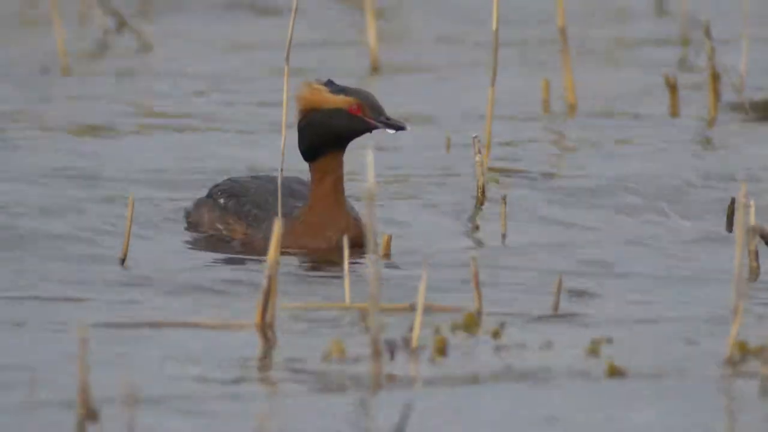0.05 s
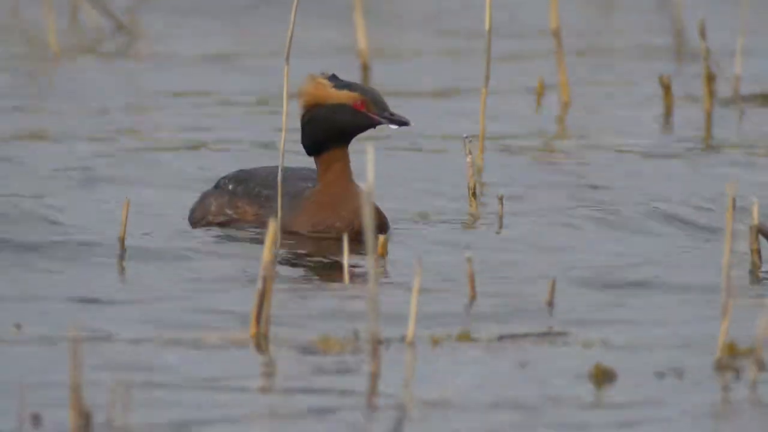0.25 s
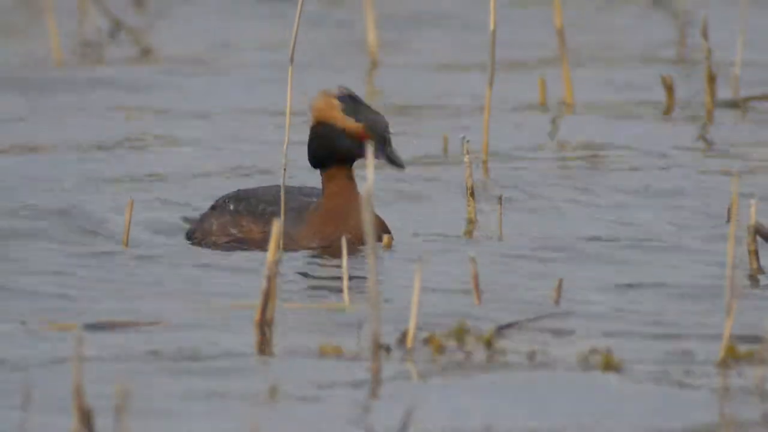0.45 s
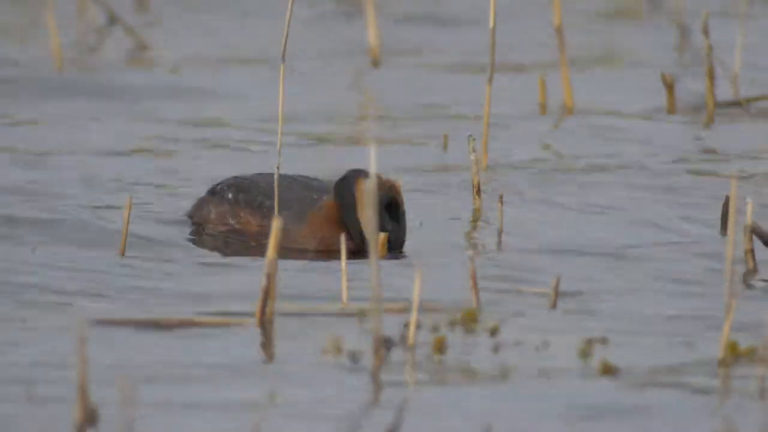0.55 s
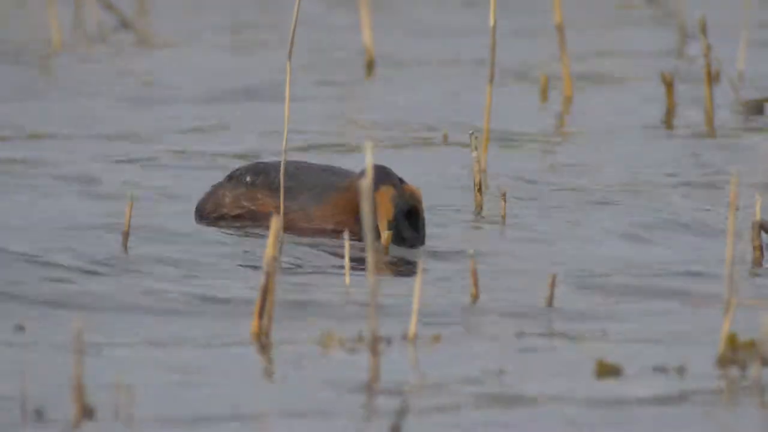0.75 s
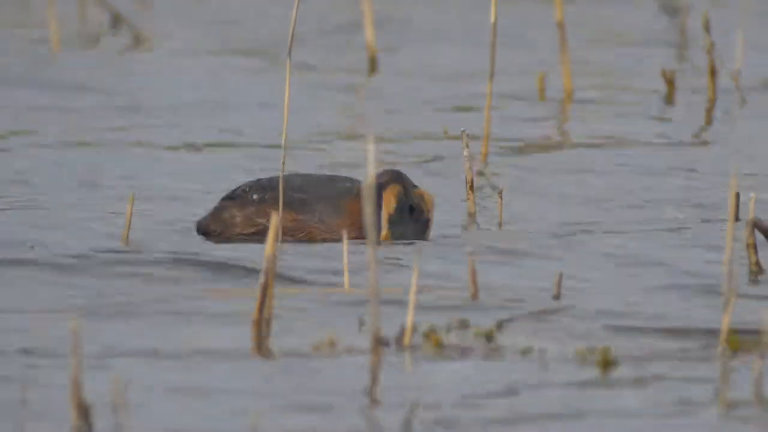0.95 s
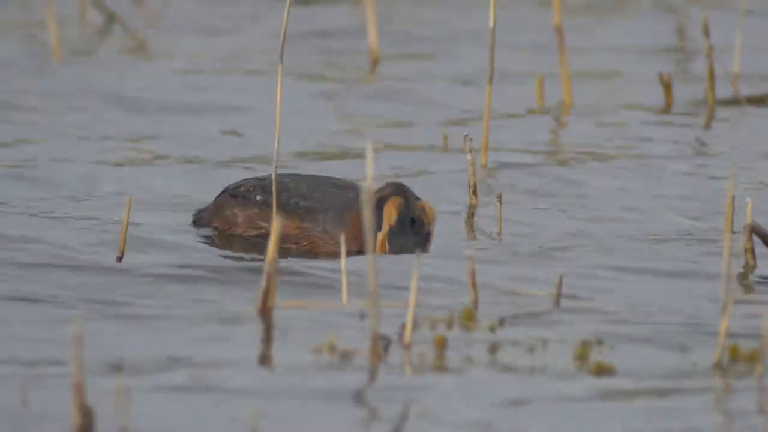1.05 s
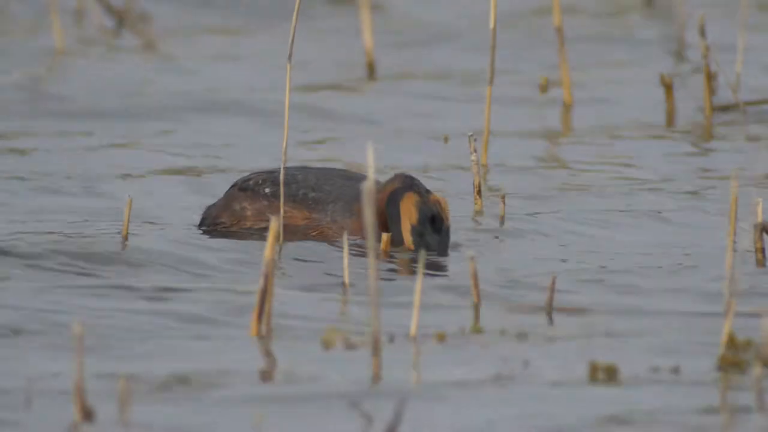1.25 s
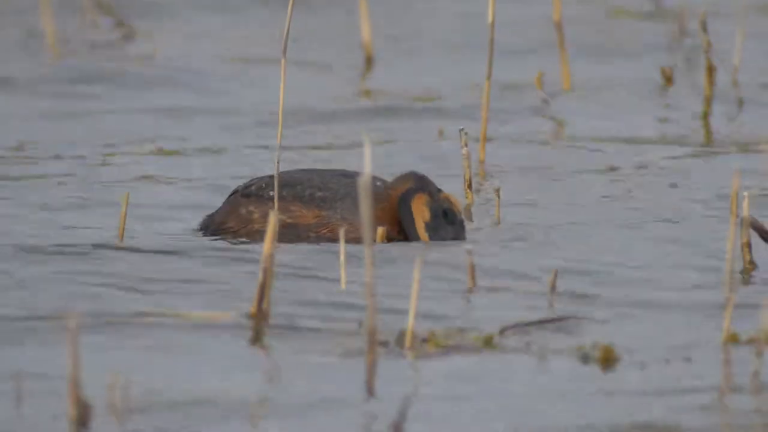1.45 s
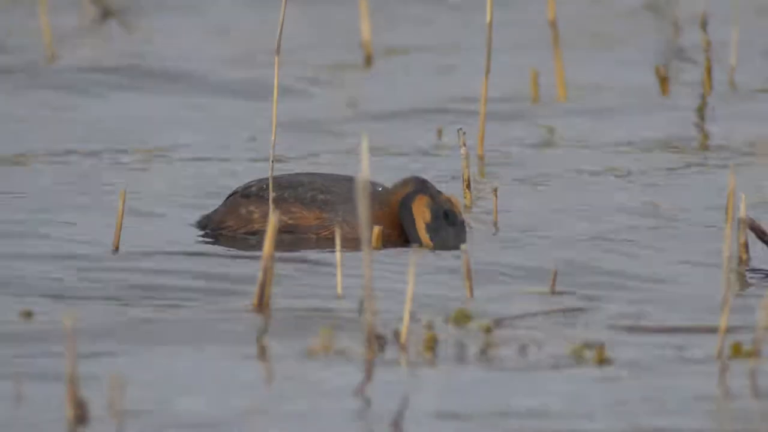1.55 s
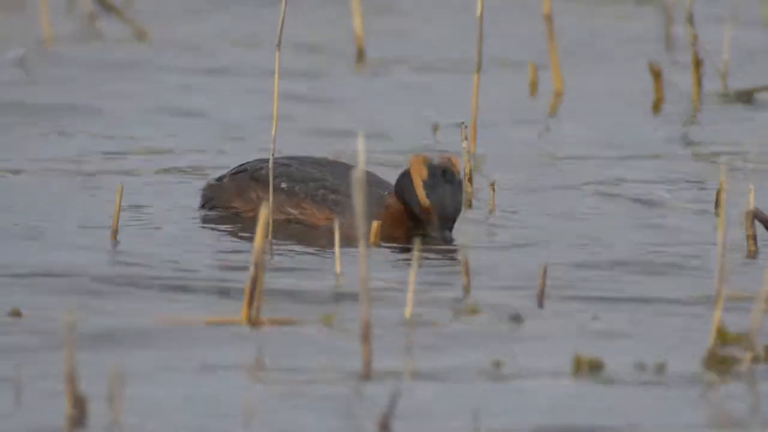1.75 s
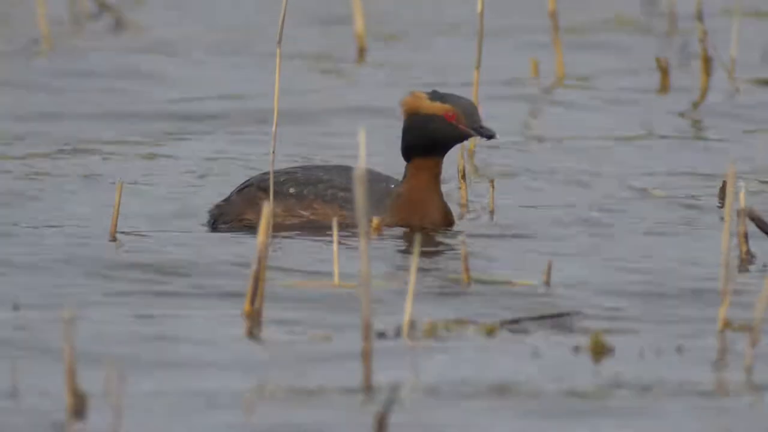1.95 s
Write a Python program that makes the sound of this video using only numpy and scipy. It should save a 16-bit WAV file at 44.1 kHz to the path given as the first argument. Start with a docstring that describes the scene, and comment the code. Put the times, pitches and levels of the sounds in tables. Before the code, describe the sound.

Wind rumble presses on the microphone, mainly on the right, with low dull thumps crowding from 0.5 to 1.0 s, then easing. A distant bird on the right gives thin whistles and fast trills around 0.5-0.9 s and 1.35-1.97 s, with fainter high twitters between. One soft water wash comes near 1.1 s, then gentle ripples. Dry reeds tick faintly, mostly after 1.8 s, over a far roar and thin hiss.

```python
"""A distant bird off to the right gives thin whistles that break into trills: sine tones with drawn pitch and level.
Farther songbirds twitter in short sine slurs. Light wind puts shaped-noise rumble and low, sagging thumps on the
microphone, mostly on its right port. Dry reeds tick and brush in grainy noise bursts, most of them near the end.
Soft noise makes one wash and the ripples of a lake shore, over a far-off roar and a thin hiss."""
import sys
import numpy as np
from scipy import signal
from scipy.fft import rfft, irfft, next_fast_len
from scipy.io import wavfile
from scipy.ndimage import map_coordinates

SR = 44100
rng = np.random.default_rng(int(sys.argv[2]) if len(sys.argv) > 2 else 0)


def to_wav(s):
    """Save 16-bit WAV."""
    ch = np.atleast_2d(s).T  # columns
    pcm = np.round(np.clip(ch, -1, 1) * 32767)  # PCM
    wavfile.write(sys.argv[1], SR, pcm.astype(np.int16))


N = 88200

# Left-right likeness of sound from all around: f/Hz, correlation (-1 to 1)
OPEN_AIR = [(100, 1), (850, 0.8), (1400, 0.26), (2000, 0.37), (3300, -0.44), (6000, 0.33), (10000, 0.31)]


def amp(db):
    """Decibels to gain."""
    return 10 ** (np.asarray(db) / 20)


def unit(x):
    """Scale to rms 1."""
    return x / np.sqrt(np.mean(x ** 2) + 1e-20)


def clock():
    """Time of every sample in seconds."""
    return np.arange(N) / SR


def along(points, hz):
    """Read a (f/Hz, value) curve on a log frequency axis."""
    f, value = np.transpose(points)
    return np.interp(np.log(hz + 1), np.log(f + 1), value)


def curves(rows):
    """One value per sample for each column after the time."""
    s, *columns = np.transpose(rows)
    return [np.interp(clock(), s, column) for column in columns]


def wobble(rate):
    """A smooth random curve with rate knots a second."""
    knots = rng.standard_normal(4096)
    return map_coordinates(knots, [clock() * rate + 2], mode="wrap")


def gate(start, end, edge):
    """1 between two times, with smooth edges."""
    opening = 1 + np.tanh(2 * (clock() - start) / edge)
    closing = 1 + np.tanh(2 * (end - clock()) / edge)
    return opening * closing / 4


def filtered(x, response):
    """Shape x with a response given as a function of frequency."""
    m = next_fast_len(N + SR // 2)
    hz = np.fft.rfftfreq(m, 1 / SR)
    return irfft(rfft(x, m) * response(hz), m)[..., :N]


def rush(spectrum, alike, left_db):
    """Coloured stereo noise, rms 1 on the right; the mid-side balance sets the left-right likeness."""
    def mid_side(hz):
        turn = np.arccos(np.clip(along(alike, hz), -1, 1)) / 2
        return amp(along(spectrum, hz)) * [np.cos(turn), np.sin(turn)]

    mid, side = filtered(rng.standard_normal((2, N)), mid_side)
    return np.array([amp(left_db) * unit(mid + side), unit(mid - side)])


def shore(x):
    """Diffuse stereo echo from the banks: a noise tail whose decay time depends on frequency."""
    # Echo decay: f/Hz, time to fall 60 dB/s
    echo_decay = [(500, 0.66), (2000, 0.8), (8000, 0.097)]
    noise = rng.standard_normal((2, SR // 2))
    hz, t, z = signal.stft(noise, SR, nperseg=256)
    fall_db = -60 * t / along(echo_decay, hz)[:, None]
    tail = signal.istft(z * amp(fall_db), SR, nperseg=256)[1]
    tail = tail / np.linalg.norm(tail[0])
    return signal.fftconvolve(x[None], tail, axes=1)[:, :N]


def whistler():
    """A pure whistle whose trills swing in pitch, dipping around the low point, less so as the notes fuse."""
    # One table per whistled call: t/s, f/Hz, level/dB
    call_shapes = [
        [(.365, 1820, -71), (.4, 1860, -60), (.418, 1880, -64)],
        [(.499, 2130, -53), (.507, 2040, -52.5), (.513, 1890, -59), (.525, 1877, -54), (.565, 1840, -48),
         (.595, 1827, -49), (.62, 1950, -49), (.626, 1930, -53)],
        [(.694, 2120, -47), (.702, 1863, -46.5), (.722, 1806, -47.5), (.739, 1950, -45), (.776, 2040, -44),
         (.81, 2037, -43), (.842, 2069, -43.5), (.866, 2027, -41), (.885, 2050, -48)],
        [(1.35, 1621, -61), (1.379, 1740, -45.5), (1.404, 1960, -46.5), (1.424, 2007, -46),
         (1.446, 2047, -45.5), (1.468, 1958, -43), (1.49, 1927, -42.5), (1.525, 1963, -41), (1.558, 1960, -43),
         (1.57, 1985, -49)],
        [(1.636, 2100, -45), (1.646, 1994, -45.5), (1.66, 1908, -46), (1.69, 1960, -47), (1.73, 2010, -48.5),
         (1.762, 2008, -43), (1.775, 1775, -47), (1.797, 1700, -45), (1.803, 1706, -65), (1.835, 1700, -47)],
        [(1.919, 2040, -46.5), (1.945, 1995, -41.5), (1.962, 2007, -43.5), (1.969, 1890, -46)],
    ]
    # Trills: first note t/s, last note t/s, rate/Hz, swing/Hz, lag of pitch behind loudness/rad,
    # dip between notes/dB, share of swing and dip lost by the last note (0-1)
    trills = [(0.7005, 0.838, 52.6, 84, 0.11, 24, 0.65), (1.383, 1.463, 47.5, 60.3, 0.35, 21, 0.092),
              (1.654, 1.762, 57, 125, 1.16, 23, 0.045)]
    call_edge_s, trill_fade_s = 0.0074, 0.006
    jitter_hz, shimmer_db = 7, .5
    left_db, echo_db = -26, -21

    bend_hz = jitter_hz * wobble(150)
    level_change_db = shimmer_db * wobble(90)
    for first, last, rate, swing_hz, lag, depth_db, fusing in trills:
        turn = 2 * np.pi * rate * (clock() - first)
        progress = (clock() - first) / (last - first)
        on = gate(first, last, trill_fade_s) * (1 - fusing * progress)
        bend_hz = bend_hz + on * swing_hz * np.cos(turn - lag)
        level_change_db = level_change_db - on * depth_db * np.sin(turn / 2) ** 6

    voice = np.zeros(N)
    for call in call_shapes:
        hz, db = curves(call)
        tone = np.sqrt(2) * np.sin(2 * np.pi * np.cumsum(hz + bend_hz) / SR)
        voice += gate(call[0][0], call[-1][0], call_edge_s) * amp(db + level_change_db) * tone
    direct = np.array([amp(left_db) * voice, voice])
    return direct + amp(echo_db) * shore(voice) * amp([[-8], [0]])


def songbirds():
    """Faint sine slurs and whistles from far away; the rougher ones waver and flutter."""
    # Notes: t/s, length/s, start f/Hz, end f/Hz, level before stereo placing/dB, roughness (0-1)
    twitters = [(.222, .022, 3020, 3080, -75, .4), (.241, .03, 3080, 3850, -73, .5),
                (.268, .022, 4000, 3620, -75, .5), (.357, .014, 4400, 3800, -72, .2),
                (.446, .016, 4050, 3700, -70.5, .2), (.536, .013, 4150, 3750, -70, .2),
                (.629, .013, 4150, 3800, -72, .2), (.554, .09, 3170, 2950, -77, .4),
                (.645, .04, 3300, 2750, -74, .6), (.645, .115, 2810, 2600, -75.5, .9),
                (.782, .018, 2850, 3500, -73.5, .2), (.884, .016, 2820, 3400, -74.5, .3),
                (1.037, .075, 2063, 2110, -62, .3), (1.15, .12, 2248, 2224, -68, .1),
                (1.2, .19, 3096, 3045, -69.5, .1)]
    echo_db = -9
    waver_hz, flutter_db = 45 * wobble(200), 3 * wobble(110)
    song = np.zeros(N)
    for s, length, start_hz, end_hz, db, rough in twitters:
        u = np.clip((clock() - s) / length, 0, 1)  # progress through the note
        hz = start_hz + (end_hz - start_hz) * u + rough * waver_hz
        swell = np.sqrt(abs(np.sin(np.pi * u)))
        song += amp(db + rough * flutter_db) * swell * np.sin(2 * np.pi * np.cumsum(hz) / SR)
    return song * amp([[3], [-1]]) + amp(echo_db) * shore(song)


def thumps():
    """Each eddy gives the microphone a short low shove that sags in pitch, with a sharper core."""
    # Eddies: t/s, level before the tone curve/dB, nominal f/Hz, left port against right/dB, core against body/dB
    eddies = [(.24, -26.5, 162, -11, -9), (.51, -19, 176, -11, -2.5), (.524, -19.5, 400, -18, -15),
              (.528, -13.5, 142, -15, -16), (.536, -23, 430, -18, -14), (.54, -12, 202, -17, -13.5),
              (.558, -22.5, 203, -17, -19.5), (.575, -12.5, 199, -17.5, -2), (.585, -18, 253, -16, -2.5),
              (0.608, -18, 160, -17, -7), (.624, -13, 280, -22, -10), (.63, -19.5, 139, -13, -21),
              (.652, -17.5, 209, -17, -1.5), (0.659, -11.5, 156.7, -13.5, -33), (.707, -15, 236, -19, -15),
              (.714, -22, 140, -16, -18), (.732, -21, 240, -25, -22), (.756, -18.5, 140, -12.5, -15),
              (.766, -11.5, 178.5, -15, -2), (0.845, -16, 143, -14, -10), (.879, -14, 192, -14.5, -14),
              (0.913, -15.5, 138, -17, -2), (.936, -22.5, 214, -18, -20), (0.959, -23.5, 162, -24, -22),
              (1.003, -13, 287, -20.5, -18), (1.012, -24.5, 157, -25, -12), (1.173, -23, 163, -10, -28),
              (1.326, -19, 122, -13.5, -6), (1.342, -16, 146, -13.5, -10), (1.45, -19.5, 140, -7.5, -22),
              (1.691, -32, 153, -8, -19), (1.731, -27, 124, -11, -29)]
    # Tone curve: f/Hz, level/dB
    thump_tone = [(20, -15.5), (70, 3), (600, 0), (1200, -15), (2500, -36)]
    body_cycles, core_cycles = 0.5, 0.31  # Gaussian width, exponential decay
    pitch_spread, sag, core_pitch = 0.21, 0.18, 1.98  # full scatter, phase bend, core-to-body ratio
    core_left_db = -17  # on top of the left port level

    out = np.zeros((2, N))
    chances = rng.random((len(eddies), 2))
    for (s, db, hz, left_db, core_db), (pitch_chance, phase) in zip(eddies, chances):
        cycles = np.clip((clock() - s) * hz, -4, 4)
        turns = cycles * (1 + pitch_spread * (pitch_chance - .5)) - sag * cycles ** 2
        body = np.exp(-(cycles / body_cycles) ** 2 / 2) * np.sin(2 * np.pi * (turns + phase))
        core = np.exp(-abs(cycles) / core_cycles) * np.sin(2 * np.pi * (turns * core_pitch + phase))
        stereo_core = amp(core_db) * amp([[core_left_db], [0]]) * core
        out += amp([[db + left_db], [db]]) * (body + stereo_core)
    return filtered(out, lambda hz: amp(along(thump_tone, hz)))


def wind():
    """Lumpy wind rumble on the microphone, made of low shaped noise."""
    # Rumble on the right port: t/s, level/dB
    wind_level = [(0, -38), (.38, -34.5), (.47, -30.5), (.53, -22.5), (.64, -29), (.69, -28.5), (.82, -33),
                  (.89, -30.5), (1.06, -30.5), (1.1, -48.5), (1.29, -39.5), (1.42, -33), (1.53, -33),
                  (1.6, -36.5), (1.66, -35.5), (1.73, -36.5), (1.78, -43.5), (1.92, -38.5), (2, -44)]
    # Colour: f/Hz, relative level per Hz/dB
    rumble_colour = [(20, -48), (40, -18.5), (75, 1), (140, 3.5), (220, -5.5), (350, -14), (600, -30.5),
                     (1500, -45.5), (4000, -110)]
    # Left-right likeness: f/Hz, correlation (-1 to 1)
    wind_alike = [(100, 1), (500, 0.69)]
    db, = curves(wind_level)
    lumps_db = 1.5 * wobble(44.43)
    return amp(db + lumps_db) * rush(rumble_colour, wind_alike, left_db=-11)


def reeds():
    """Dry reeds brush and tick: bright noise in short bursts with a fast random grain."""
    # Strokes: t/s, level before grain/dB, rise/s, fall/s
    brushes = [(0.657, -52.5, 0.00083, 0.0012), (.807, -63, 0.0011, .002), (1.407, -63, .002, 0.0048),
               (1.791, -51.5, 0.017, 0.017), (1.833, -53, 0.0087, 0.02), (1.909, -63, 0.016, 0.011),
               (1.919, -50.5, 0.00079, 0.00077), (1.969, -49.5, 0.0005, 0.00053)]
    # Colour: f/Hz, relative level per Hz/dB
    reed_colour = [(1500, -28), (4000, -13), (7700, -6.5), (8600, 3.5), (11000, 4.5), (13000, -6),
                   (15500, -8.5)]
    # Left-right likeness: f/Hz, correlation (-1 to 1)
    reed_alike = [(4000, 0.24), (9000, 0.68)]
    stroke = np.zeros(N)
    for s, db, rise, fall in brushes:
        away = np.maximum((s - clock()) / rise, (clock() - s) / fall)
        stroke += amp(db) * np.exp(-away)
    grain_db = 2.5 * wobble(900)
    return stroke * amp(grain_db) * rush(reed_colour, reed_alike, left_db=0.0)


def water():
    """Rippling noise picks up in the second half, led in by one soft wash."""
    # Levels on the right: t/s, level/dB
    ripple_level, wash_level = [(0, -69), (.94, -60.5), (1.01, -72), (1.25, -51.5), (1.5, -49.5),
                                (1.8, -48), (2, -51.5)], [(.95, -62), (1, -48.5), (1.07, -45.5), (1.12, -39),
                                                      (1.16, -43.5), (1.19, -47.5), (1.25, -56.5),
                                                      (1.33, -72)]
    # Colours: f/Hz, relative level per Hz/dB
    ripple_colour, wash_colour = [(200, 0.5), (450, -4), (700, -3.5), (1200, 3), (1600, -9.5), (2200, -9),
                                  (3000, -20.5), (4200, -24.5), (5200, -37), (8000, -32), (15000, -54)], [(100, -26), (300, 2), (550, 2), (900, -2.5), (1500, -16),
                                                   (2600, -17), (4200, -23.5), (5200, -35), (7500, -28.5),
                                                   (9800, -26.5), (12000, -31), (15000, -46)]
    ripple_db, = curves(ripple_level)
    wash_db, = curves(wash_level)
    ripples = amp(ripple_db + 0.28 * wobble(40.3)) * rush(ripple_colour, OPEN_AIR, left_db=1.5)
    wash = amp(wash_db + 1.86 * wobble(120)) * rush(wash_colour, OPEN_AIR, left_db=-3.0)
    return ripples + wash


def distance():
    """A far-off roar and a thin hiss, both wide shaped noise with slow changes of level."""
    # Levels on the right: t/s, level/dB
    roar_level, air_level = [(0, -49), (.5, -48), (1, -46.5), (1.4, -47), (2, -47.5)], [(0, -61.5), (.15, -64.5), (.55, -67), (.95, -69),
                                                 (1.5, -65), (2, -69.5)]
    # Colours: f/Hz, relative level per Hz/dB
    roar_colour, air_colour = [(30, -20), (150, 6), (350, -9), (600, -10.5), (800, 0.5), (970, 4.5),
                               (1200, -4.5), (1500, -16.5), (2000, -32), (3000, -89), (6000, -38)], [(100, 15.5), (2000, -14.5), (3200, 5.5), (5500, -3),
                                             (8000, -3), (9800, 2.5), (12000, -4.5), (15000, -7)]
    roar_db, = curves(roar_level)
    air_db, = curves(air_level)
    roar = amp(roar_db + 0.59 * wobble(11.1)) * rush(roar_colour, OPEN_AIR, left_db=-1.5)
    hiss = amp(air_db) * rush(air_colour, OPEN_AIR, left_db=0.55)
    return roar + hiss


def scene():
    """Everything heard from the shore."""
    return whistler() + songbirds() + thumps() + wind() + reeds() + water() + distance()


def record(dry):
    """Keep nothing at or above the band limit."""
    top_hz = 15500
    return filtered(dry, lambda hz: hz < top_hz)


dry = scene()
out = record(dry)
to_wav(out)
```